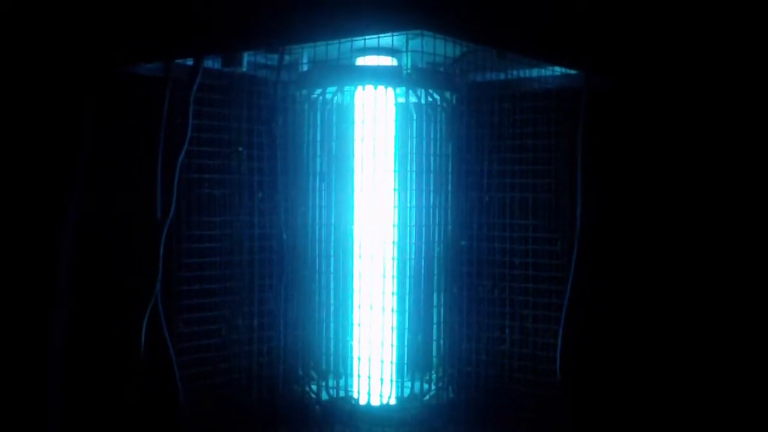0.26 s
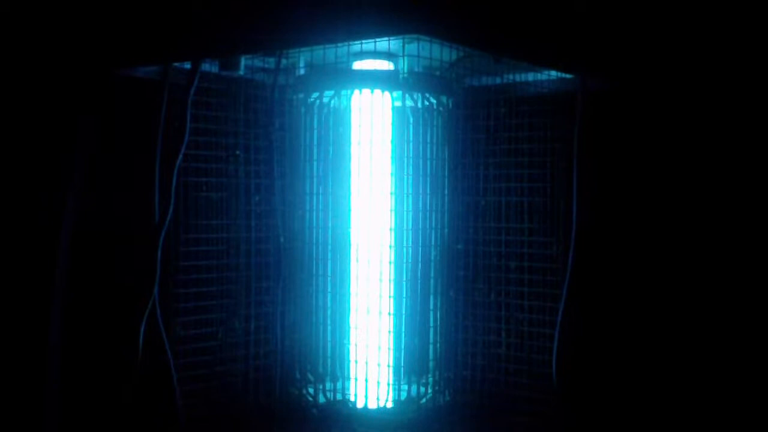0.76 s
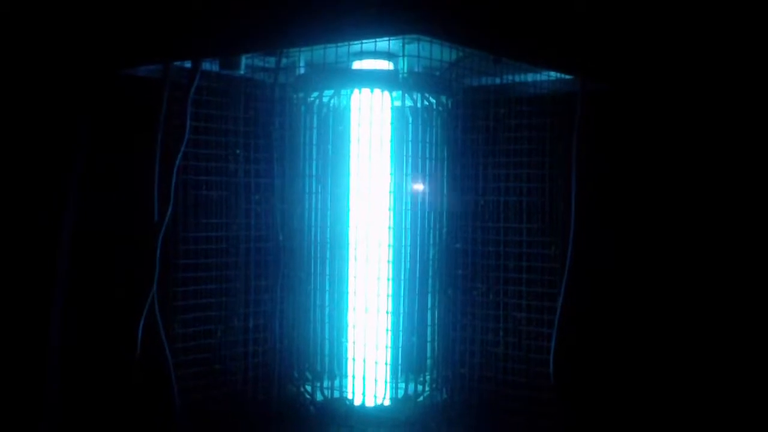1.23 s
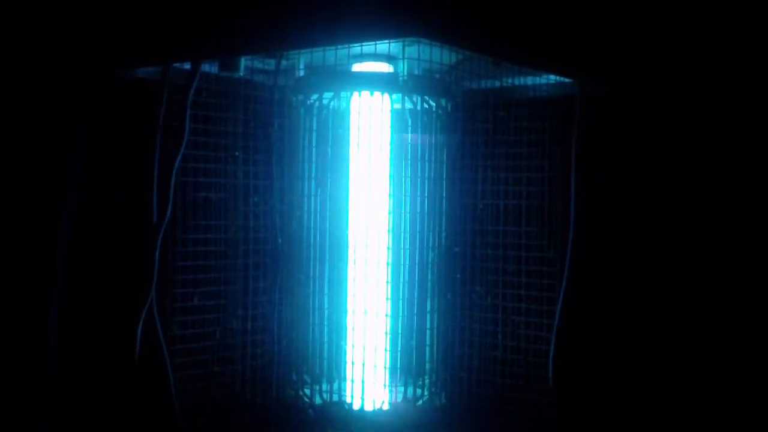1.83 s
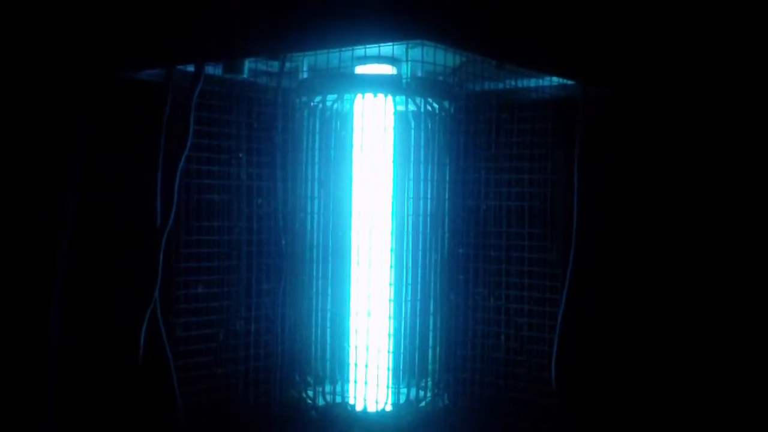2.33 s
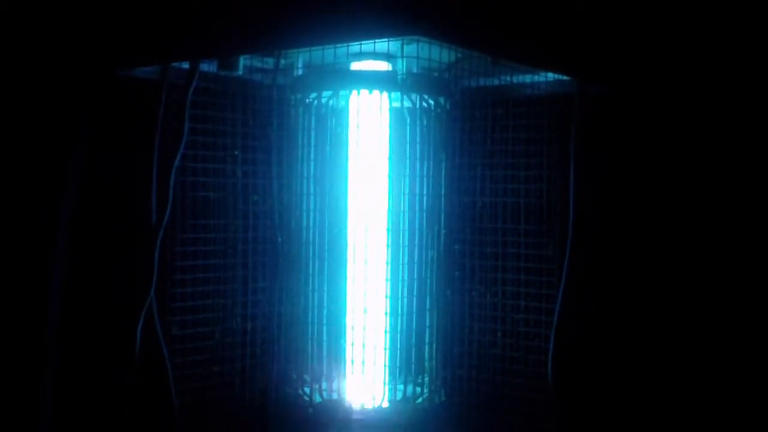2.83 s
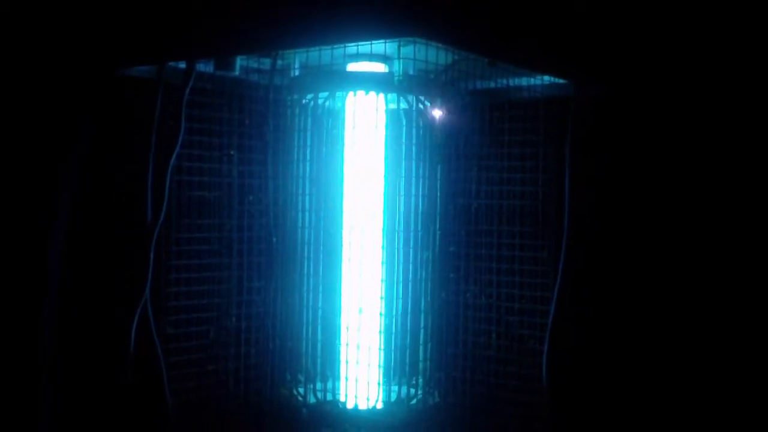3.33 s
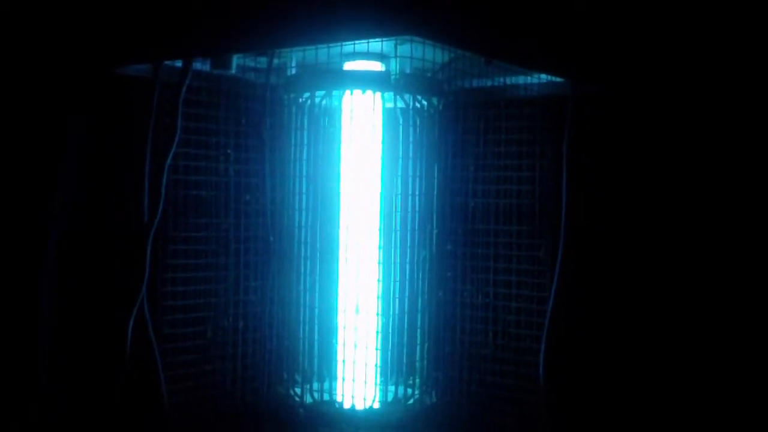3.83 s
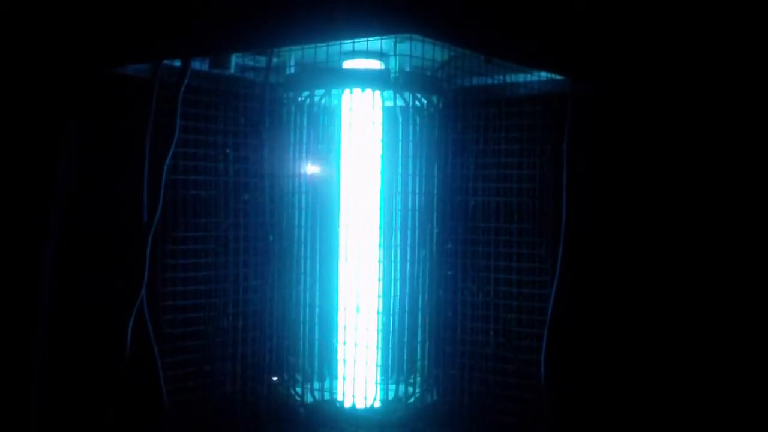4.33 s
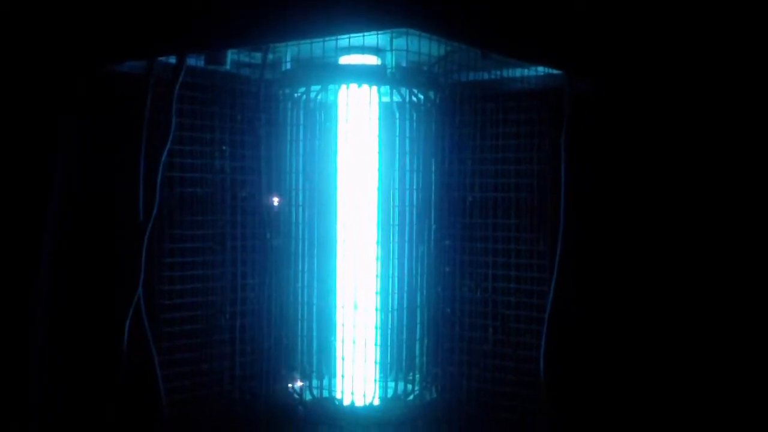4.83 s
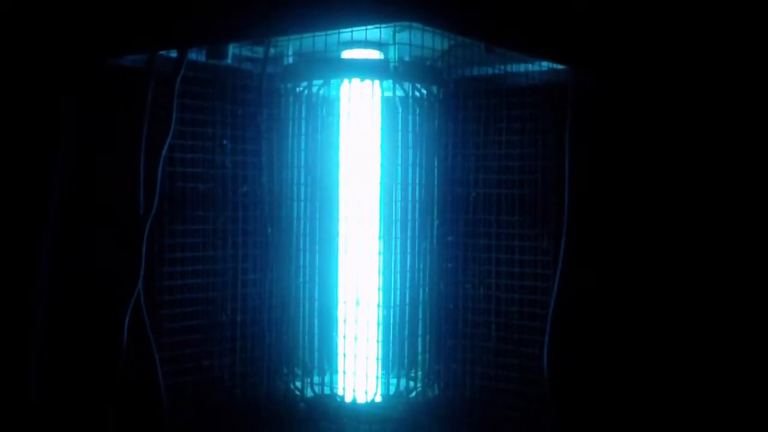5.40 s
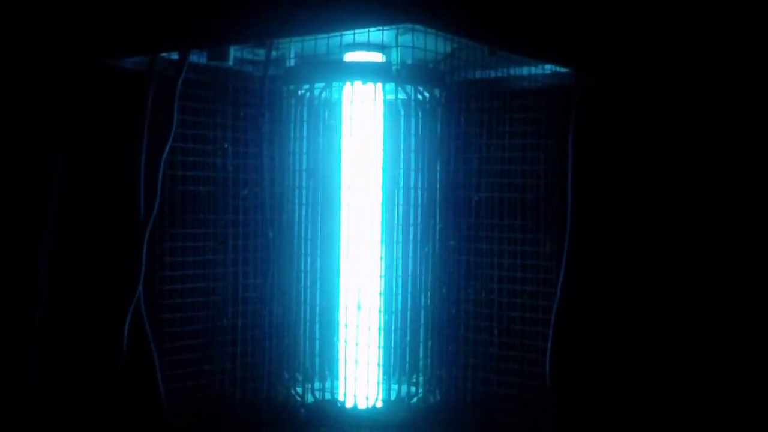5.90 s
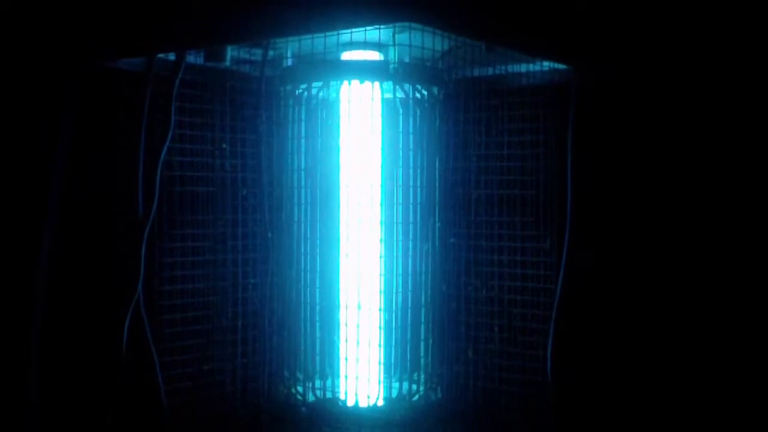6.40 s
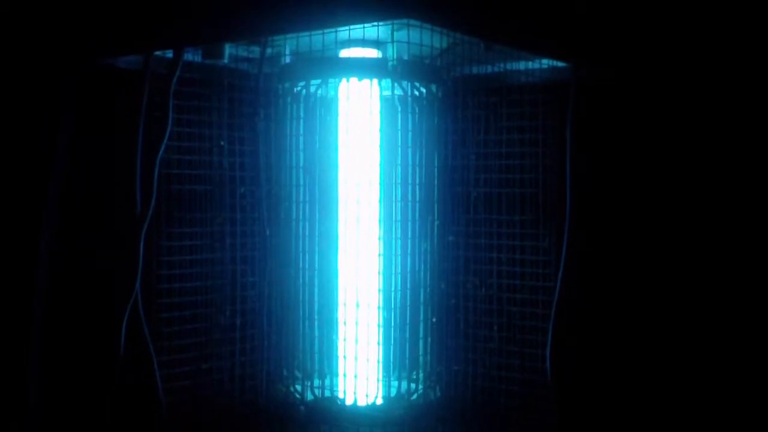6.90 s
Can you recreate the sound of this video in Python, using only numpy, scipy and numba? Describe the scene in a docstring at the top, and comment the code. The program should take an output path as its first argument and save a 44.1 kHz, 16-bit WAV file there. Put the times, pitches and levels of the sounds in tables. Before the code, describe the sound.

Irregular electric zaps from an insect trap, sparse at first, then a dense sputtering buzz, then separate snaps again, above distant road noise.

```python
"""An electric insect trap zaps at night: an insect that bridges the grid draws one arc in each half cycle
of the mains, and each arc is a quick train of sparks that click through the metal cage.
Walls throw back short echoes and the yard adds a soft tail. There are a few dull knocks, and far-off
traffic hums and hisses under a faint steady treble.
The microphone's gain control turns down when the sound is loud, then climbs back."""
import sys
import numpy as np
from scipy import signal
from scipy.fft import rfft, irfft, next_fast_len
from scipy.io import wavfile
from scipy.ndimage import uniform_filter1d, map_coordinates
from numba import njit

SR = 44100
rng = np.random.default_rng(int(sys.argv[2]) if len(sys.argv) > 2 else 0)


def master(y):
    """Save y as 16-bit WAV."""
    cut = np.clip(np.atleast_2d(y).T, -1, 1)
    pcm = np.round(cut * 32767)  # scale
    wavfile.write(sys.argv[1], SR, pcm.astype(np.int16))


N = 315315  # length in samples
LEAD = SR // 10  # samples before time zero, so that an earlier zap can still echo


def amp(db):
    """Decibels to a plain gain."""
    return 10 ** (np.asarray(db) / 20)


def unit(x):
    """Scale to rms 1."""
    return x / np.sqrt(np.mean(x ** 2) + 1e-20)


def along(points, hz):
    """Read a curve of (f/Hz, value) points at the frequencies hz, on a log frequency axis."""
    f, v = np.transpose(points)
    return np.interp(np.log(hz + 1), np.log(f + 1), v)


def curves(rows):
    """One value per sample for each column after the time."""
    s, *cols = np.transpose(rows)
    return [np.interp(np.arange(N) / SR, s, c) for c in cols]


def wobble(rate):
    """A smooth random curve through `rate` random points a second."""
    points = rng.standard_normal(int(N * rate / SR) + 4)
    return map_coordinates(points, [np.arange(N) * rate / SR])


def filtered(x, response):
    """Filter x by a response given as a function of frequency."""
    m = next_fast_len(len(x) + 4096)
    return irfft(rfft(x, m) * response(np.fft.rfftfreq(m, 1 / SR)), m)[:len(x)]


def peak(f, hz, width_hz):
    """One resonance, gain 1 at its centre."""
    return 1j * f * width_hz / (hz * hz - f * f + 1j * f * width_hz)


def rush(spectrum, patchy_db):
    """Noise of rms 1 shaped by a spectrum, with patches of random gain in time and frequency."""
    z = signal.stft(rng.standard_normal(N), nperseg=512)[2]
    field = uniform_filter1d(rng.standard_normal(z.shape), 5, 0)
    field = uniform_filter1d(field, 10, 1)
    noise = signal.istft(z * amp(patchy_db * unit(field)), nperseg=512)[1][:N]
    return unit(filtered(noise, lambda hz: amp(along(spectrum, hz))))


def trap():
    """Every arc takes the spark rate and colour of its zap; row 0 is the arcs, row 1 plain pulses.
    Each pulse has its arc's energy by level and length, and leaves in all directions."""
    # each time an insect bridges the grid: t/s, half cycles it lasts, middle level/dB before scatter,
    # rise/dB from first arc to last, typical arc length/ms, typical gap between sparks/ms,
    # level/dB of the two low cage resonances, level/dB of the narrow ring
    zap_rows = [(-0.06, 4, -14, 0, 3.8, 0.67, -14, -7), (0.414, 1, -10, -6, 1.92, 0.41, 3, 5.5),
                (0.548, 1, -26, 0, 1.0, .9, 0, 1.7), (0.5551, 7, -6.5, -1.5, 4.94, 0.76, -3.5, 3.7),
                (0.622, 3, -5, -3, 4.5, 1.34, -6.5, 3), (1.0149, 2, -1, -3, 2.18, 0.36, 0, 5),
                (1.3393, 1, -5, -0.5, 2.7, 0.53, -3, 3.5), (1.932, 3, -3.5, -18, 3.6, .5, -3, 0.5),
                (2.1221, 3, -4.5, -1.5, 4.74, 0.97, -3.5, 5), (2.1819, 3, -6.5, -10, 4.9, .8, -5.5, 0),
                (2.4977, 7, -2.5, 5.5, 5.2, 0.59, -6, 2.5), (2.6214, 1, -4, -3, 5, 0.76, -4, 2.5),
                (2.9465, 3, -3.5, -5, 6.6, 0.65, -8, 1), (3.3076, 1, -11, -12, 1.3, .4, -2.5, 4),
                (3.3247, 1, -4.5, -1.5, 1.62, 0.35, -1, 3.5), (3.4241, 2, -4, 3.5, 3.2, 0.7, -3.5, -1),
                (3.5137, 6, -5, 0, 7, 0.82, -7.5, 3.5), (3.7143, 2, -2, 0.5, 4, 0.76, -4, 0.5),
                (3.846, 1, -2.5, -4, 3.4, 0.82, 3, 12.5), (3.8553, 6, -6.5, -1.5, 7, .7, 1.5, 9.5),
                (4.3646, 2, -3, 2, 3.9, 0.58, -1, 1), (4.4225, 3, 0.2, 6.5, 4.6, 0.62, -2, 5),
                (4.4717, 3, 1.5, -3, 6.5, 0.92, -2.5, 5.5), (4.6305, 1, -5.5, -2, 3.4, 1, -10, -3),
                (4.6498, 1, -6, -8, 3.7, .9, -11.5, -5), (4.6645, 5, -4, -1, 6.2, 1.14, -6.5, 0),
                (4.714, 2, -10, -7, 5.1, 0.83, -13, -15), (4.742, 1, -11.8, -6, 5.2, 1.1, -9, -1.1),
                (4.7481, 10, -1.5, -2, 6.5, 0.81, -6.5, 1.5), (4.8395, 1, -5, -2, 2.2, 0.81, -4, 8),
                (4.8836, 5, -2, -5, 5, 1.4, -4.5, 2), (4.9312, 1, -10, 2, 2.2, 1.36, -4.6, 4),
                (4.9491, 5, -1.5, -5, 3.9, 1.5, -5.5, 2.6), (4.9995, 6, -4, -7, 4.8, 1.5, -6, 3.5),
                (5.1821, 5, -6.5, -6, 4.6, 1.33, -4.5, 5.5), (5.2306, 4, -8.5, -2, 4.7, 1.47, -3.5, 2.7),
                (5.299, 1, -13, 2, 3, 1.0, -8, 4.2), (5.308, 3, -17.5, -10.5, 8.6, 1.0, -6.5, 3),
                (5.416, 1, -10.5, -6, 1.27, 0.6, -9, -0.5), (5.9248, 1, -9, -4.5, 2, 0.38, 2.5, 6.5),
                (5.955, 3, -4.5, 1.5, 6.4, 0.67, -5.5, 1.5), (6.04, 1, -2.9, 0, 1.9, 1.1, -7, -.6),
                (6.0565, 3, -1.3, -4, 5.7, 1.17, -8.5, 2.5), (6.1064, 4, 2.5, -7.5, 4.2, 1.17, -6, 1),
                (6.4736, 5, -1, -0.5, 5.7, 0.72, -5, 1.2), (6.6824, 1, 3, 4, 1.8, .9, -6.6, .8),
                (6.699, 3, 0.5, -7.5, 4.7, 0.75, -7, 3), (6.783, 2, 0, -1, 3.7, 1.24, -6, -1),
                (7.0088, 1, -12.5, -20.5, 2.64, .5, 0, 1.8)]
    tip_db_per_ms, even_gap_ms = 1.5, 1  # fast spark trains favour the lowest resonance over the second
    colour_scatter_db = .8
    out = np.zeros((2, N + SR))
    draws = rng.standard_normal((len(zap_rows), 12, 4))
    for (*burn, gap_ms, low_db, ring_db), draw in zip(zap_rows, draws):
        tip_db = tip_db_per_ms * (even_gap_ms - gap_ms) + colour_scatter_db * draw[0, 3]
        voices_db = [low_db + tip_db, low_db - tip_db, ring_db, 0, 0]
        for s, length_ms, db, middle in arcs(*burn, draw):
            sound = arc(length_ms, middle, gap_ms, voices_db)
            out[0, LEAD + round(s * SR):][:len(sound)] += amp(db) * sound
            half_way = LEAD + round((s + length_ms / 2000) * SR)
            out[1, half_way] = amp(db) * np.sqrt(length_ms * SR / 1000)
    return out[:, :LEAD + N]


def arcs(s, half_cycles, db, rise_db, length_ms, draw):
    """The first arc strikes at the touch, the others centre near the next mains crests.
    Gives rows of start/s, length/ms, level/dB, middle (0-1)."""
    crests_per_s, first_crest_s = 119.96, .0069
    crest_scatter_ms, length_scatter, level_scatter_db = .4, .17, 1.5
    short_gains_db_per_ms = 1.3  # a shorter arc burns harder
    middle_base, middle_per_ms = .23, .04  # where an arc's energy centres, later in long arcs
    # the touch comes part-way through a half cycle: a longer zap opens weaker and shorter
    first_arc_db, first_arc_share = -3, 0.97

    k = np.arange(round(half_cycles))
    later, draw = k > 0, draw[k].T
    lengths = np.clip(length_ms * np.exp(length_scatter * draw[0] * later), 1, 8)
    lengths[0] *= first_arc_share if later.any() else 1
    middles = middle_base + middle_per_ms * lengths

    # the crest nearest to the middle of the first arc
    first = round((s + middles[0] * lengths[0] / 1000 - first_crest_s) * crests_per_s)
    crests = first_crest_s + (first + k) / crests_per_s
    on_crest = crests + (crest_scatter_ms * draw[1] - middles * lengths) / 1000
    starts = np.where(later, on_crest, s)

    levels = db + rise_db * (k / max(k[-1], 1) - .5)
    levels -= short_gains_db_per_ms * (lengths - length_ms)
    levels[0] += first_arc_db * later.any()
    levels += level_scatter_db * draw[2] * later
    return zip(starts, lengths, levels, middles)


def arc(length_ms, middle, gap_ms, voices_db, size=1024):
    """The gap recharges and breaks down again and again; every spark clicks through the cage."""
    # resonances that colour each spark: f/Hz, width/Hz; the lower three ring in the cage, the top two give the
    # bare crack
    cage_modes = [(3200, 1600), (5500, 1500), (7500, 750), (10200, 2200), (13900, 2200)]
    # their basic strengths, before each zap's colour: level/dB
    cage_levels = [0, 1.5, 1.5, -0.5, -2]
    # the housing's low answer to every spark: f/Hz, width/Hz, level/dB over the lowest cage resonance
    body_modes = [(550, 300, -6), (1330, 490, -3.5)]
    draw = rng.standard_normal((3, size))
    ms = np.cumsum(gap_ms * np.exp(.32 * draw[0, :40]))  # uneven gaps
    ms -= ms[0]
    ms = ms[ms <= max(length_ms - .4, 0)]  # the last click still has to ring out
    share = ms / length_ms
    lean_db = 25 * (middle - .45) * (share - .5)  # early arcs start hard and fade, late ones build up
    swell_db = -4 * length_ms * (share - middle) ** 2  # a long arc follows the mains voltage up and down
    sparks = np.zeros(size)
    sparks[(ms * SR / 1000).astype(int)] = amp(lean_db + swell_db + 2.8 * draw[1, :len(ms)])

    t = np.arange(size // 4) / SR
    wires = 0.14 * draw[2, :len(t)] * amp(-60 * t / 0.0034)  # scatter off the wires and the lamp
    wires[0] = 1  # the direct click
    sparks = np.convolve(sparks, wires)[:size]

    f = np.fft.rfftfreq(2 * size, 1 / SR)
    response = 0  # neighbouring resonances have opposite signs
    for k, (hz, width_hz) in enumerate(cage_modes):
        response = response + (-1) ** k * amp(cage_levels[k] + voices_db[k]) * peak(f, hz, width_hz)
    for k, (hz, width_hz, db) in enumerate(body_modes):
        response = response + (-1) ** k * amp(db + voices_db[0]) * peak(f, hz, width_hz)
    sound = irfft(rfft(sparks, 2 * size) * response)[:size]
    # same power while it burns, whatever its length: 3 dB above rms 1
    return amp(3.0) * sound * np.sqrt(length_ms * SR / 1000 / np.sum(sound ** 2))


def walls(x):
    """A few hard echoes, each slightly smeared by an uneven surface and limited to a middle band."""
    # single echoes: delay/ms, level/dB before the band filter
    echo_rows = [(2.4, -17), (6.5, -14), (12, -21), (32, -20), (71, -22), (95, -29)]
    echoes, smear = np.zeros(SR // 5), np.arange(SR // 500)
    for ms, db in echo_rows:
        rough = rng.standard_normal(len(smear)) * np.exp(-smear)
        echoes[round(ms * SR / 1000):][:len(smear)] += amp(db) * rough / np.linalg.norm(rough)
    returned = signal.fftconvolve(x, echoes)[:len(x)]
    # the band that the walls return best: 7000 Hz, one resonance applied twice
    return filtered(returned, lambda hz: peak(hz, 7000, 6500) ** 2)


def yard(x):
    """A diffuse tail that takes a moment to build: a quick near part, and a far part
    that dies at its own speed for each frequency."""
    # time for the far part to fall by 60 dB: f/Hz, t60/s
    fade_times = [(500, 0.27), (3000, 0.44), (8000, 0.58), (15000, 0.41)]
    # colour of the tail: f/Hz, relative level/dB
    tone = [(500, -33), (1500, -6.5), (3000, -7), (5500, -3), (8000, -2.5), (10500, -4), (12000, -8.5),
            (14000, 0.5), (16000, -15)]
    hz, t, z = signal.stft(rng.standard_normal(SR), SR, nperseg=256)
    near = amp(-60 * t / 0.054)
    far = amp(-21.5 - 60 * t / along(fade_times, hz)[:, None])
    shaped = z * (near + far) * amp(along(tone, hz))[:, None]
    tail = signal.istft(shaped, SR, nperseg=256)[1]
    tail *= 1 - np.exp(-np.arange(len(tail)) / (.012 * SR))  # 12 ms build-up
    return amp(-10.0) * signal.fftconvolve(x, tail / np.linalg.norm(tail))[:len(x)]


def thumps():
    """Dull knocks: a low push with little ring, a shorter click and one slower swing, all decaying sines."""
    # t/s, level/dB, f/Hz of the push, t60/s of the push, then relative to it: click level/dB, swing level/dB
    knocks = [(0.7081, 5.5, 510, 0.0068, 4, -14), (0.719, -2.5, 760, 0.017, -14, -20),
              (4.8727, 11.5, 520, 0.0063, -30, -22), (5.101, -14, 790, 0.016, -20, -8)]
    out, t = np.zeros(N), np.arange(SR // 20) / SR
    soft = 1 - np.exp(-t / .0002)  # rounds off the start
    for s, db, hz, t60, click_db, swing_db in knocks:
        push = amp(-60 * t / t60) * np.sin(2 * np.pi * hz * t)
        click = amp(click_db - 60 * t / 0.0017) * np.sin(2 * np.pi * 1500 * t)
        swing = amp(swing_db - 60 * t / 0.042) * np.sin(2 * np.pi * 110 * t)
        out[round(s * SR):][:len(t)] -= amp(db) * soft * (push + click - swing)
    return out


def traffic():
    """Engine rumble with a few wavering tones, the 120 Hz one a lamp's hum, and tyre hiss with a singing band
    that swells as cars pass; a faint even treble lies above."""
    # slow level curves before random wander: t/s, engine rumble level/dB, tyre hiss level/dB
    passing = [(0, -32.5, -37), (.25, -22, -30.5), (.6, -26, -30.5), (1.1, -22.5, -32), (1.7, -18, -29),
               (2.2, -21, -31), (2.55, -23.5, -29.5), (2.8, -17, -28), (3.1, -23.5, -32.5),
               (3.5, -20, -28.5), (3.85, -18.5, -29.5), (4.3, -18, -25), (4.85, -19.5, -26),
               (5.3, -33.5, -39.5), (5.75, -22.5, -31.5), (6.0, -23.5, -31.5), (6.25, -17, -30),
               (6.55, -17.5, -26.5), (7.0, -20, -27.5)]
    # wavering tones: f/Hz, level/dB before a fixed lift and the swell
    drone = [(75, -29.5), (120, -42.5), (150, -48.5), (231, -46), (302, -44.5), (12020, -75)]
    # engine rumble colour: f/Hz, relative level/dB
    rumble_colour = [(12, -53), (20, -13), (86, -1), (114, 0.5), (195, -10), (233, -6), (266, -16),
                     (300, -11), (416, -18.5), (700, -29), (910, -43), (1540, -120)]
    # faint treble colour: f/Hz, relative level/dB
    night_colour = [(2470, -15), (4200, -9.5), (6130, -3), (6690, -8.5), (7780, -10), (9400, -16.5),
                    (15300, -21)]
    # the tyres' singing band: f/Hz, relative level/dB
    tread_colour = [(600, -57), (850, -8), (1050, -2.5), (1350, -3.5), (1600, -28), (2000, -56)]
    # tyre hiss colour: f/Hz, relative level/dB
    hiss_colour = [(240, -46), (400, -9.5), (600, -7.5), (800, -3), (1400, -10), (1700, -11.5), (2900, -17),
                   (3600, -24), (4300, -31), (5500, -46)]
    t = np.arange(N) / SR
    road_db, tyres_db = curves(passing)

    tones = np.zeros(N)
    for hz, db in drone:
        level = amp(db + 5 + 0.89 * wobble(6.2))
        tones += level * np.sin(2 * np.pi * hz * t + 1.0 * wobble(9))
    tones *= amp(0.75 * (road_db - road_db.mean()))  # the tones swell with the engine rumble, less strongly

    rumble = amp(road_db + 1.3 * wobble(7)) * rush(rumble_colour, patchy_db=1.8)
    night = amp(-48.5) * rush(night_colour, patchy_db=.6)
    singing_db = -4  # under the tyre hiss
    singing = amp(tyres_db + singing_db + 1.5 * wobble(3)) * rush(tread_colour, patchy_db=2.4)
    hiss = amp(tyres_db + 2.74 * wobble(8)) * rush(hiss_colour, patchy_db=0.5)
    return rumble + tones + night + singing + hiss


def scene():
    """Zaps with their echoes and tail, over traffic and knocks."""
    zaps, puffs = trap()
    outdoors = zaps + walls(zaps) + yard(puffs)
    return (outdoors[LEAD:] + traffic() + thumps())[None]


@njit
def gain_control(x, top, limit_db, fall, rise, follow, start_db, least_db):
    """Listens to its own clipped output: turns down while that is over the limit, else climbs steadily."""
    out, power, gain_db = np.zeros_like(x), 1e-3, start_db
    for i in range(len(x)):
        out[i] = min(max(x[i] * 10 ** (gain_db / 20), -top), top)
        power += follow * (out[i] ** 2 - power)  # running average
        over = 10 * np.log10(power) - limit_db
        if over > 0:
            gain_db -= fall * over * (gain_db - least_db)  # slower near the least gain
        else:
            gain_db = min(gain_db + rise, 0.)
    return out


def record(dry):
    """The microphone port dips in the high treble; then gain control, clipping and the band limit."""
    x = filtered(dry[0], lambda hz: 1 - .6 * peak(hz, 12000, 1100))
    # the gain climbs 28 dB a second; loudness is averaged over about 15 ms
    x = gain_control(x, top=0.78, limit_db=-20.0, fall=.6 / SR, rise=28 / SR,
                     follow=1 / (0.015 * SR), start_db=-1.5, least_db=-54.5)
    top_hz = 15500
    x = filtered(x, lambda hz: amp(np.interp(hz - top_hz, [-400, 400, 900, 1000], [0, -38, -50, -90])))
    return np.clip(x, -1, 1)[None]


dry = scene()
out = record(dry)
master(out)
```